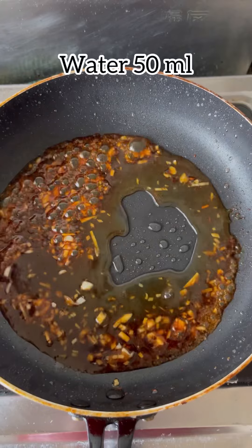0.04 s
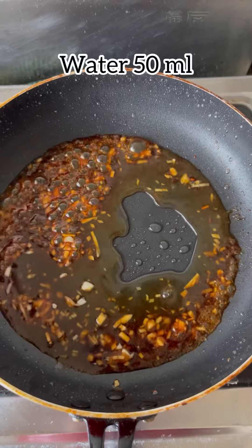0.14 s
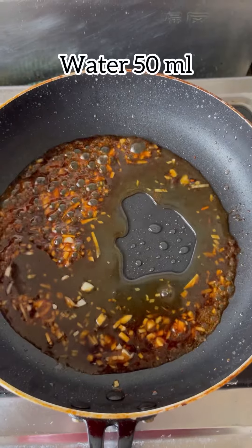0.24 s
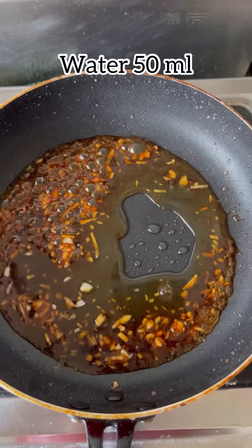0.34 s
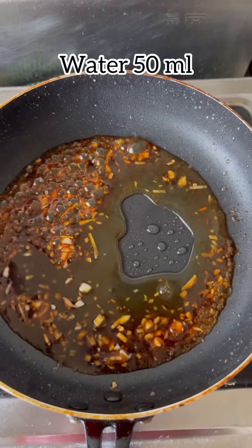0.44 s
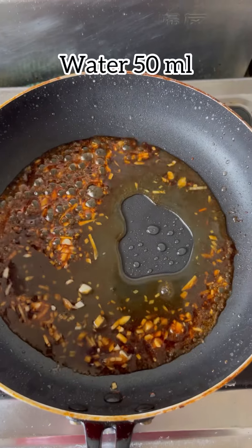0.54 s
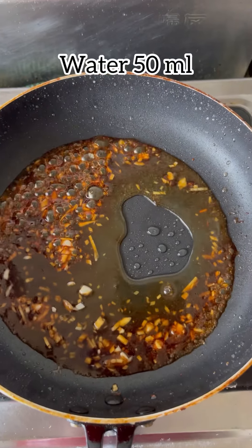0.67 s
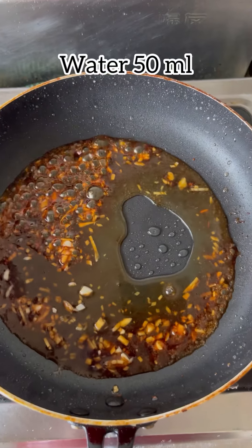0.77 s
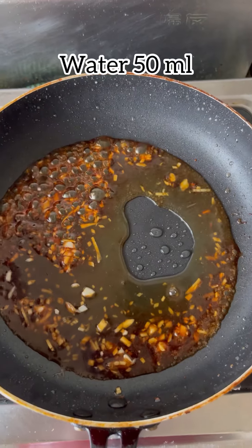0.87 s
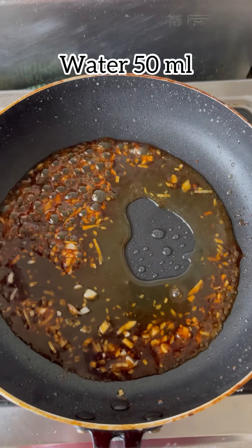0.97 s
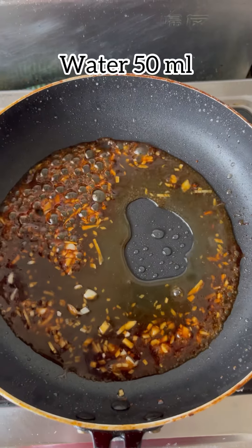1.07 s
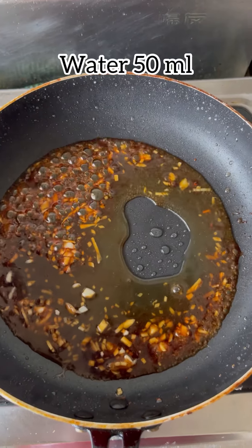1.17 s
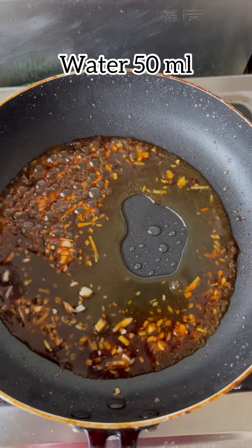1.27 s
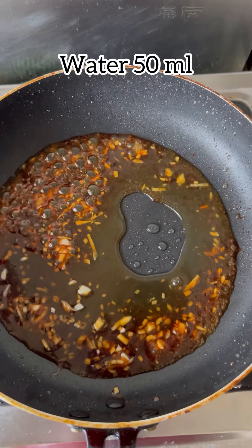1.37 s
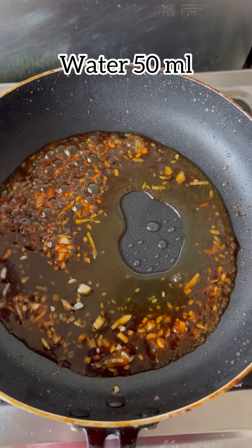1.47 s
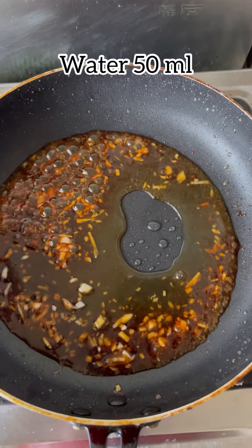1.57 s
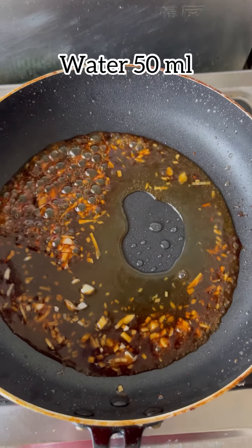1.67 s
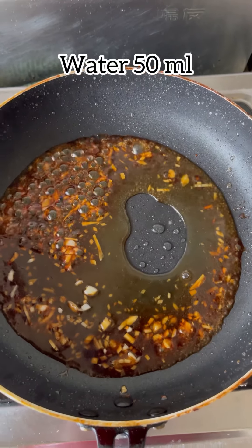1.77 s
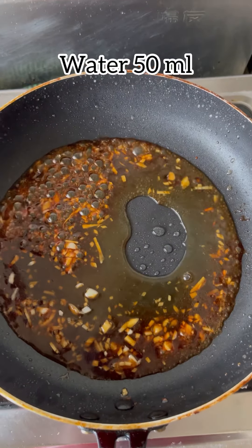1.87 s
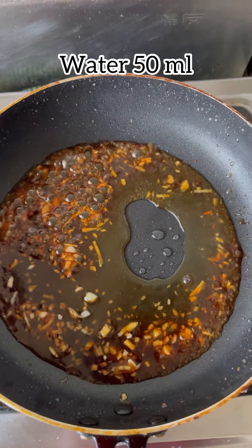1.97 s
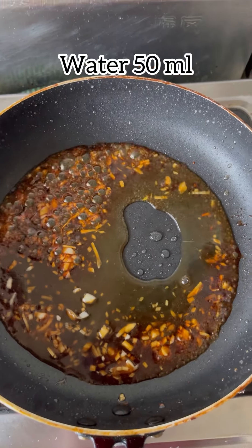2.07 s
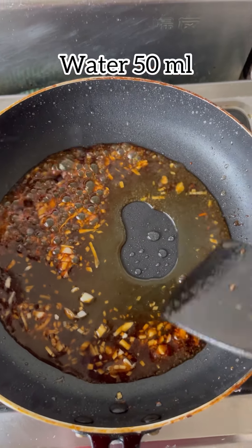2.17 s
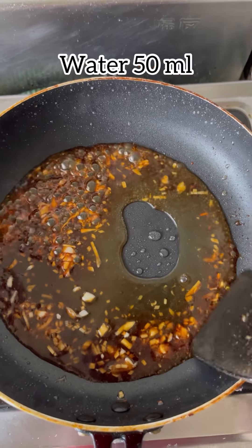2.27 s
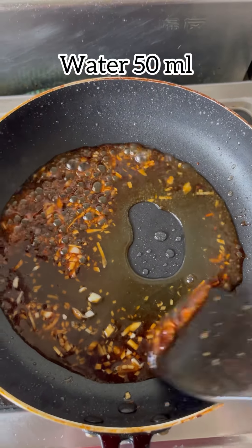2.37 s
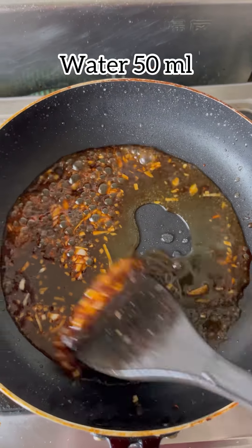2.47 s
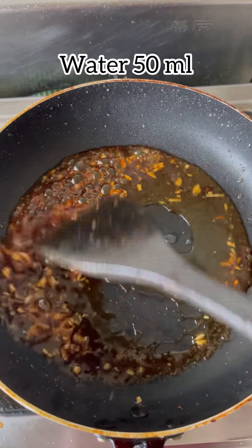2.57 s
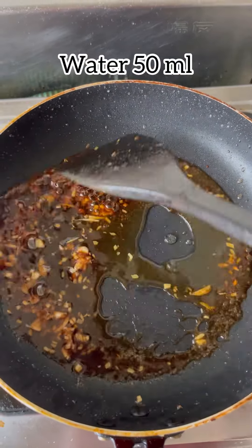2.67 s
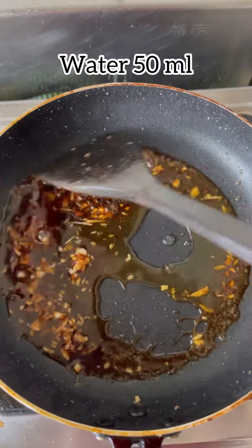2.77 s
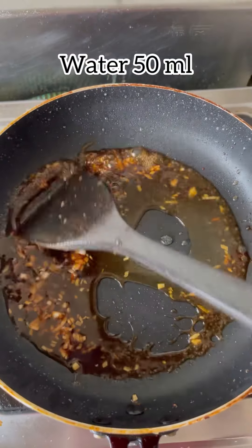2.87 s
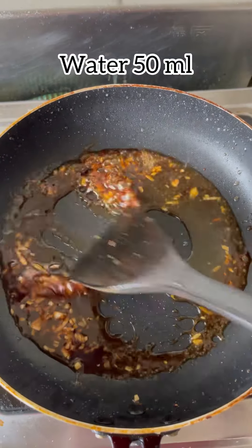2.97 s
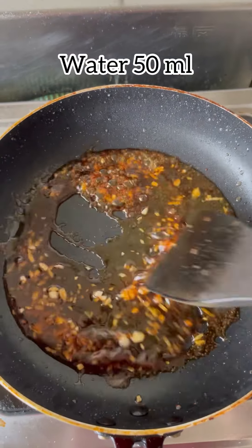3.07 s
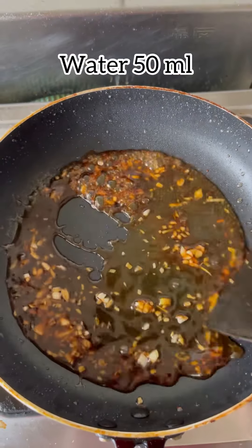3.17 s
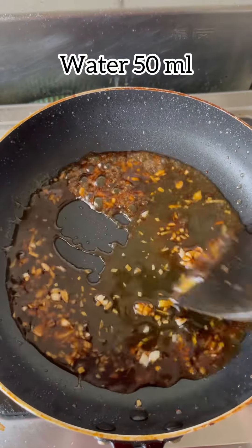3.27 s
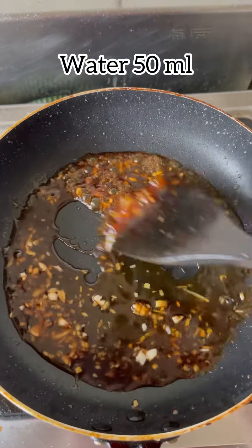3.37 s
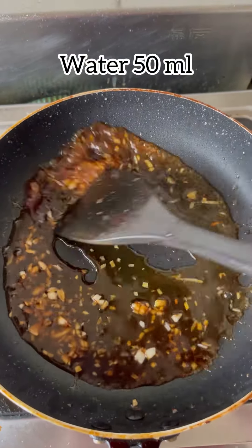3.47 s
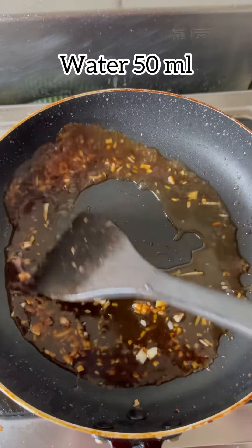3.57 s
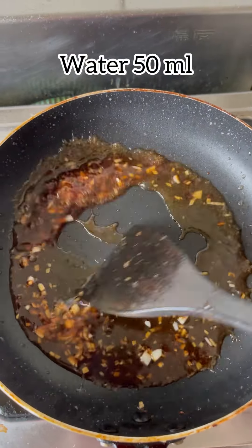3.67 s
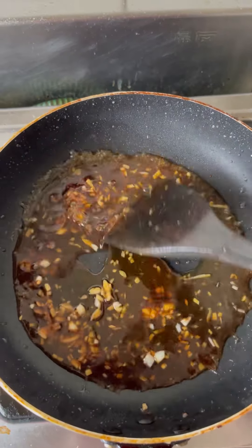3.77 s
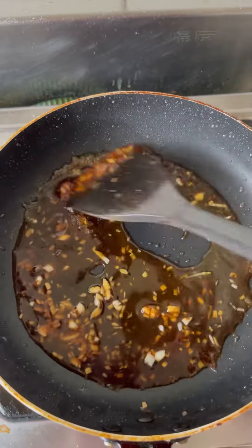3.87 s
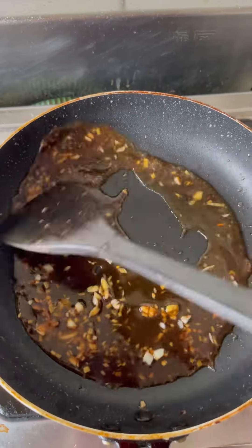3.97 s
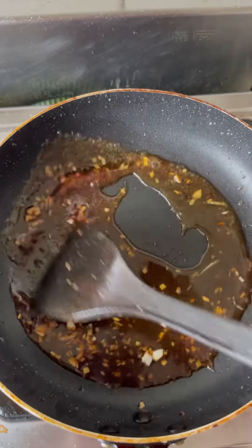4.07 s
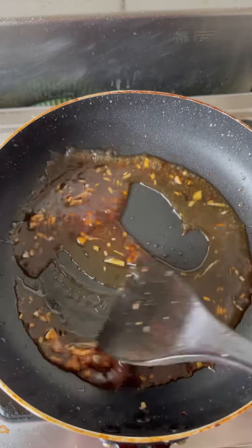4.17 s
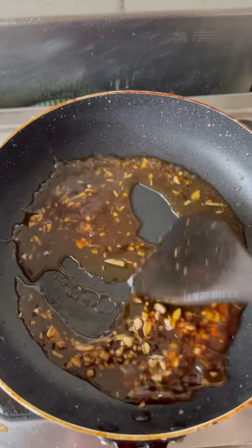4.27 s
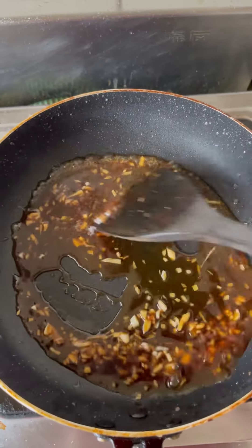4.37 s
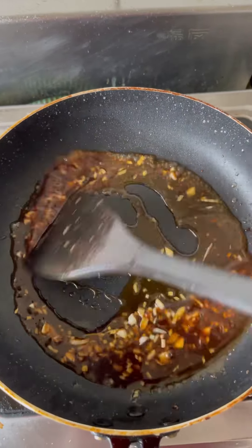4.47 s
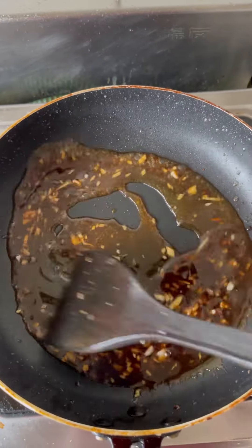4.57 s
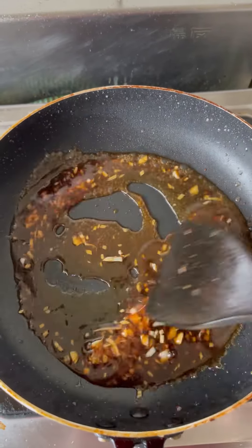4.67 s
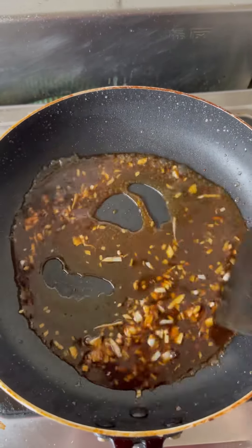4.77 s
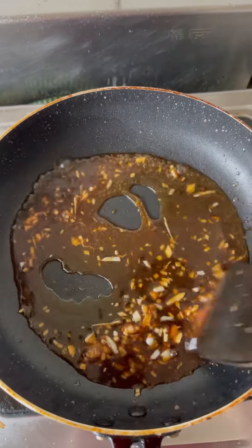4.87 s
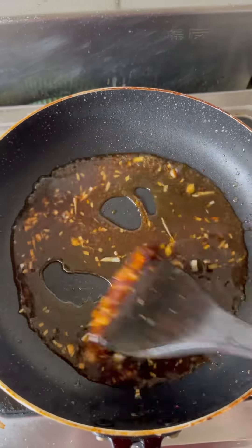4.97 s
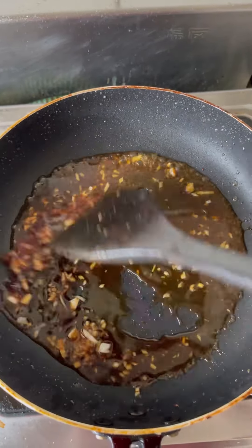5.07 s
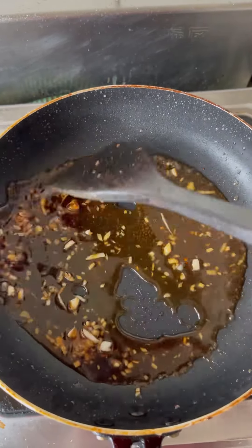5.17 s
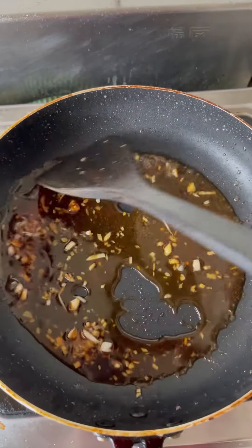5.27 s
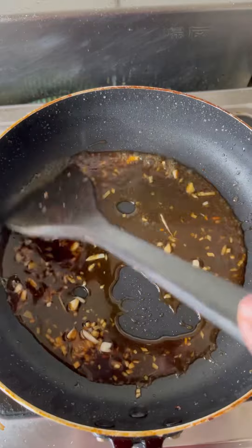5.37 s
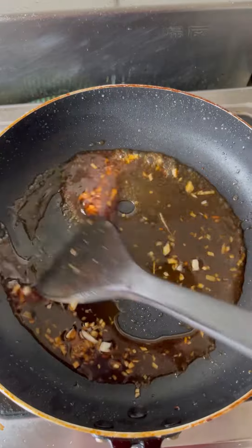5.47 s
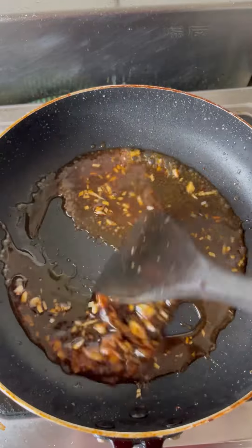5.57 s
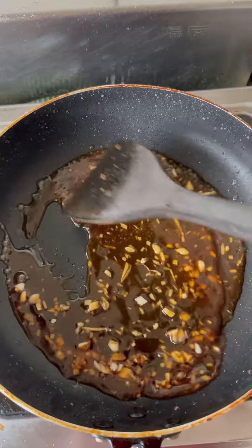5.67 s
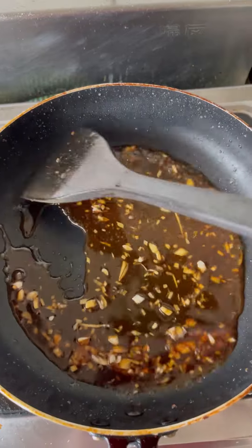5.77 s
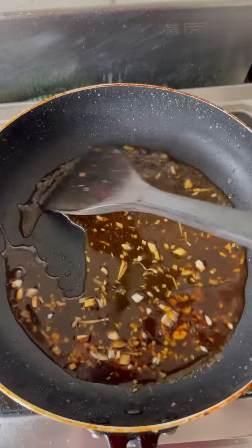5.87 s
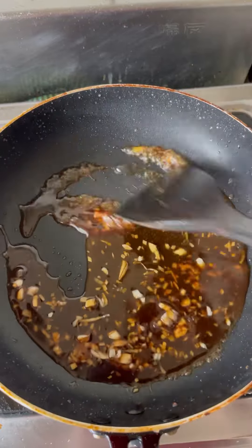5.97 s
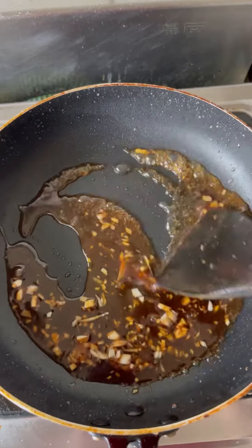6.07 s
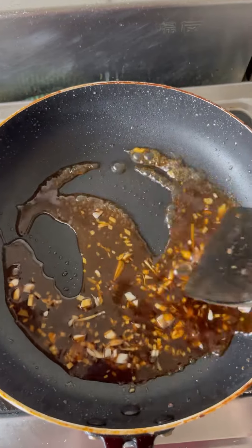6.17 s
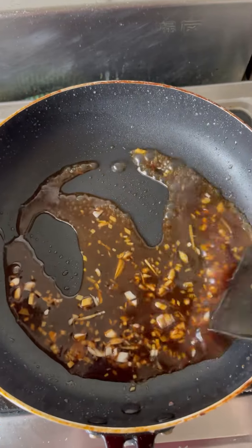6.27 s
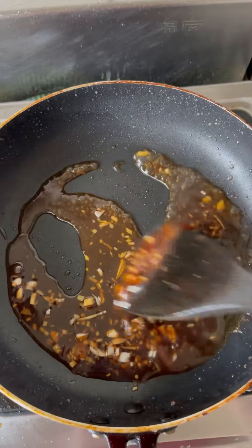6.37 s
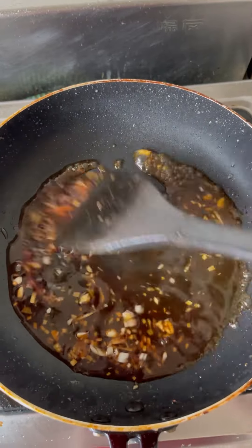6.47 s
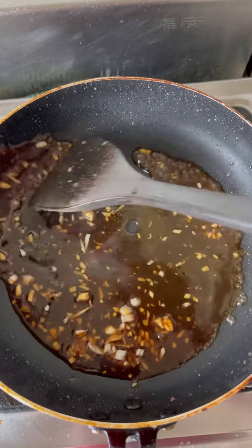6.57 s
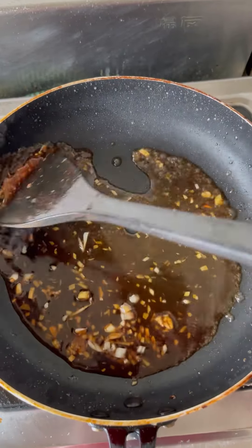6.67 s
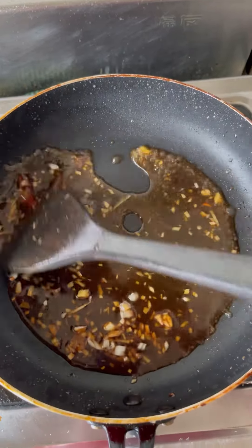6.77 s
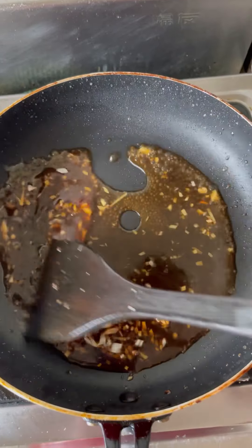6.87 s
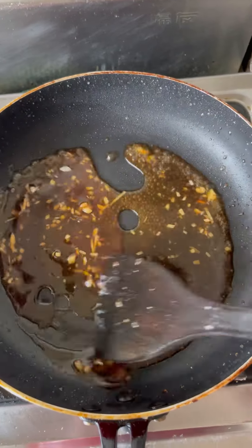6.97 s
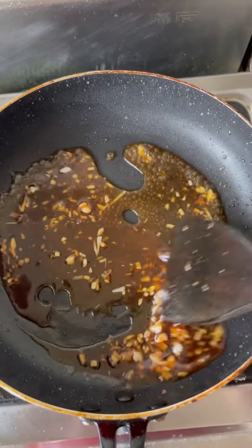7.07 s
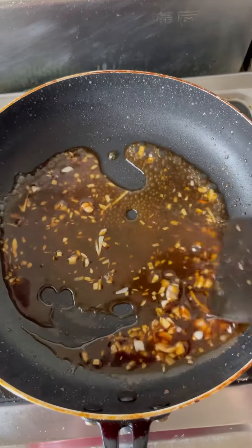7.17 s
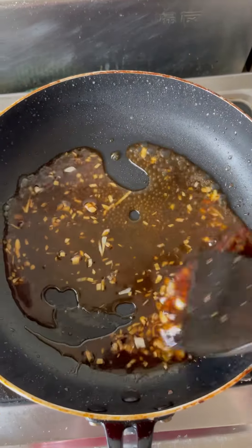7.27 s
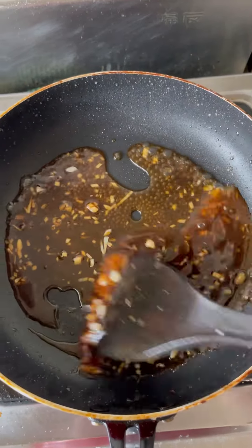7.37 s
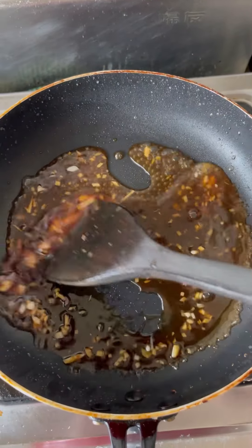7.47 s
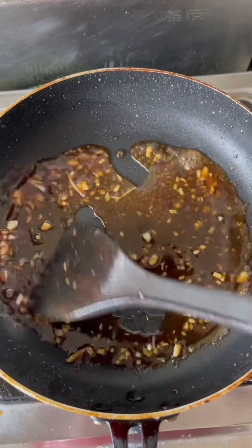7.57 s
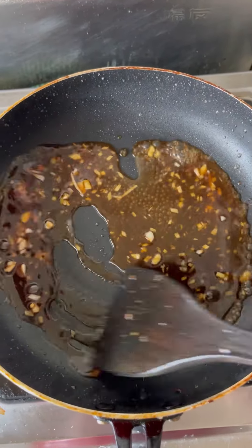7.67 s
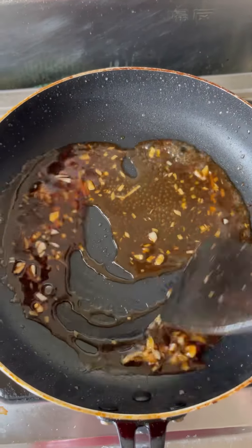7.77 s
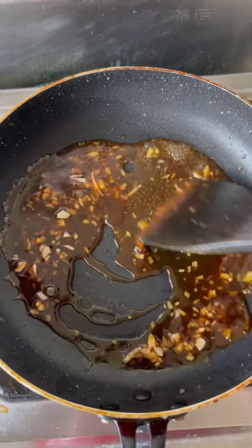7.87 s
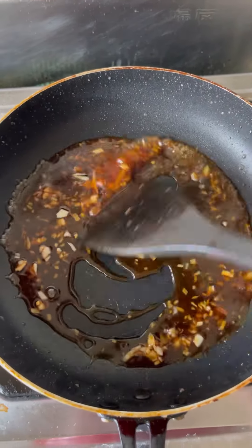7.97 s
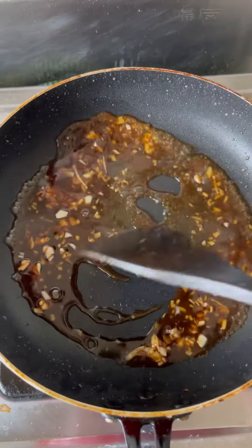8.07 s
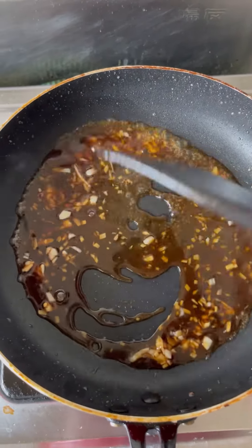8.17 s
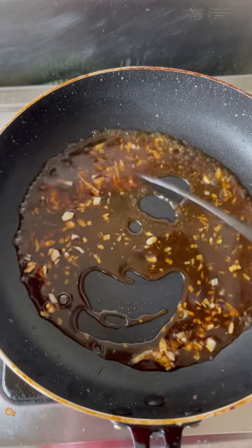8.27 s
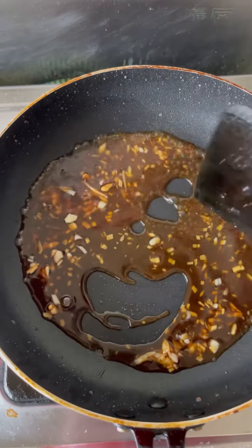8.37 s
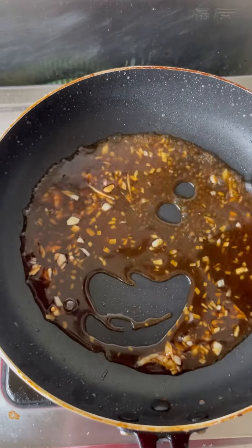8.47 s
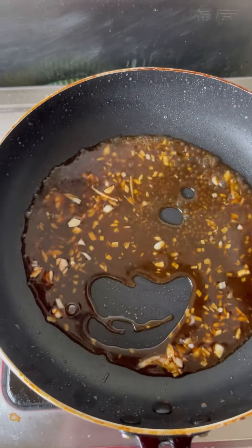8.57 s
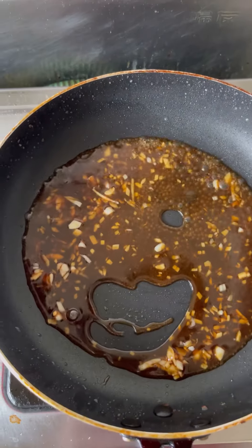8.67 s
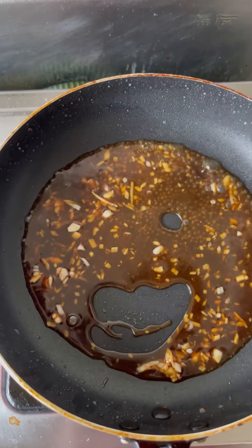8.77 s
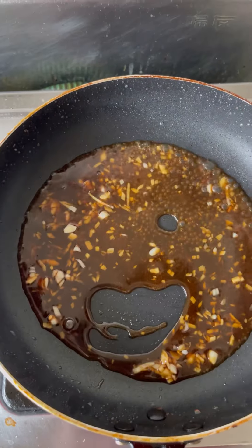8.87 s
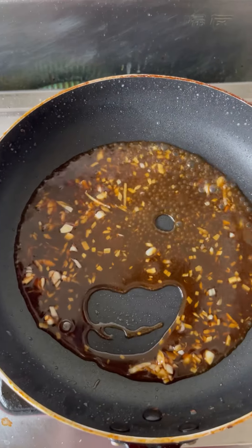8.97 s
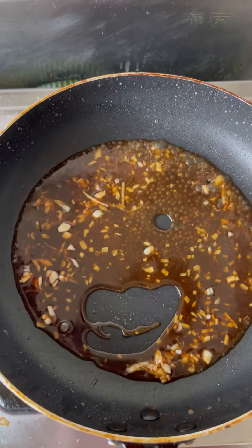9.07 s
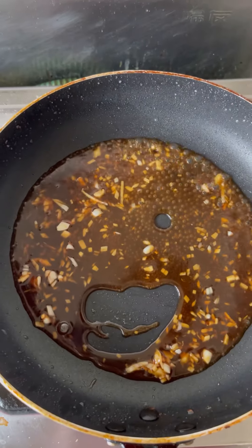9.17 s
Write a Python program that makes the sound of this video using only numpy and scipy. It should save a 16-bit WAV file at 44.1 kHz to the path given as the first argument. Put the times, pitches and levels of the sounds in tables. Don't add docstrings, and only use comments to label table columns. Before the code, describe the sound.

A shallow pan of sauce simmers close to a stereo microphone in a small kitchen. Fine bright sizzle, dense bubbling and frequent sharp spits come first, with a few pan knocks. Then a spatula stirs: clacks, soft scrapes, low thuds of the rocking pan, and hiss that flares with strokes. Spits thin out and the simmer ends quieter. A low extractor hood rumble continues throughout.

```python
import sys
import numpy as np
from scipy import signal
from scipy.fft import rfft, irfft, next_fast_len
from scipy.io import wavfile

SR = 44100
rng = np.random.default_rng(int(sys.argv[2]) if len(sys.argv) > 2 else 0)


def dump_mix(stems):
    frames = np.atleast_2d(stems).T
    limited = np.clip(frames, -1, 1)
    pcm = np.round(limited * 32767).astype(np.int16)
    wavfile.write(sys.argv[1], SR, pcm)


def field_ratio(decibels):
    return 10 ** (np.asarray(decibels, dtype=float) / 20)


N = 407043

# f/Hz, level/dB per Hz
STEAM_SPECTRUM = [(1500, -22), (2500, -10), (3300, -11), (4000, -8), (4600, -7.5), (4920, -15),
                  (5350, -6.5), (6450, -4), (8000, -7), (9400, -4), (10500, -1.5), (11000, -2),
                  (11500, -6.5), (12000, -10), (13000, -16), (14000, -14), (16000, -6)]
STEAM_LAG = 7.3


def rms_one(x):
    return x / np.sqrt(np.mean(x ** 2) + 1e-20)


def drift(rate):
    step = 40
    r = np.exp(-2 * step * np.pi * rate / SR)
    slow = signal.lfilter([1], [1, -2 * r, r * r], rng.standard_normal(N // step + 2002))[2000:]
    return np.interp(np.arange(N) / step, np.arange(len(slow)), rms_one(slow))


def colour(x, points, size=8192):
    hz, level_db = np.transpose(points)
    grid = np.maximum(np.fft.rfftfreq(size, 1 / SR), 1)
    log_gain = np.log(field_ratio(np.interp(np.log(grid), np.log(hz), level_db)))
    cepstrum = irfft(log_gain)
    cepstrum[1:size // 2] *= 2
    cepstrum[size // 2 + 1:] = 0
    response = irfft(np.exp(rfft(cepstrum)))
    return signal.oaconvolve(np.atleast_2d(x), response[None], axes=1)[:, :N]


def ports(x, lag):
    size = next_fast_len(N + 64)
    delay = np.exp(-2j * np.pi * np.fft.rfftfreq(size) * lag)
    late = irfft(rfft(x, size) * delay, size)[:N]
    return np.array([x, late])


def ring(clicks, hz, t60):
    r = field_ratio(-60 / (max(t60, .0005) * SR))
    w = 2 * np.pi * hz / SR
    return signal.lfilter([0, np.sin(w)], [1, -2 * r * np.cos(w), r * r], clicks + 1e-18)


def grains(per_s, spread_db):
    sizes = field_ratio(spread_db * np.minimum(rng.exponential(1, N), 6))
    signs = rng.choice([-1, 1], N)
    return sizes * signs * (rng.random(N) < per_s / SR)


def add(out, x, s):
    at = round(s * SR)
    out[..., at:at + x.shape[-1]] += x[..., :N - at]


def hood():
    # f/Hz, level/dB per Hz
    duct_spectrum = [(15, -43), (25, -37), (36, -37), (48, -6), (64, -8), (75, -10.5), (113, -1),
                     (188, -5.5), (217, -1), (249, -3.5), (321, -5), (409, -12.5), (435, -13), (470, -19),
                     (520, -32), (680, -61), (1140, -120)]
    # f/Hz, level/dB per Hz
    common_spectrum = [(260, -15), (450, -13), (567, -6), (618, -3.5), (708, -4), (802, -7.5), (1040, -4.5),
                       (1230, -9.5), (1780, -17.5), (2100, -12.5), (3310, -14.5), (3970, -14.5),
                       (4500, -17.5), (5850, -24.5), (9900, -120)]
    # f/Hz, level/dB per Hz
    opposed_spectrum = [(35, -53), (60, -24), (140, -21), (241, -1), (322, -9.5), (379, 4.5), (534, -13),
                        (606, 4.5), (726, -9), (1180, -7), (1550, -47), (2110, -65), (2520, -48.5),
                        (2970, -12.5), (4500, -10), (5850, -16.5), (9900, -120)]
    duct, mid, side = rng.standard_normal((3, N))
    rumble_db = -24 + .7 * drift(0.48)
    rumble = field_ratio(rumble_db) * rms_one(colour(duct, duct_spectrum))
    common = field_ratio(-36) * rms_one(colour(mid, common_spectrum))
    opposed = field_ratio(-36) * rms_one(colour(side, opposed_spectrum))
    return rumble + (common + opposed * [[1], [-1]]) * field_ratio([[-.5], [.5]])


def vigour(t):
    # t/s, level/dB
    simmer = [(0, -38.5), (.64, -37), (1.03, -40.5), (1.75, -38), (3.2, -36.5), (4.3, -39.5), (4.8, -41.5),
              (5.75, -43), (6.2, -37), (7.25, -42.5), (9.23, -42)]
    # t/s, rise/dB, hold/s
    flares = [
        (2.863, 1.5, 0.13),
        (3.352, 5.5, 0.4),
        (3.82, 4, 0.3),
        (5.226, 3.5, 0.21),
        (5.886, 6.5, 0.17),
        (5.942, 0.5, 0.076),
        (6.216, 3, 0.13),
        (7.414, 3.5, 0.29),
        (7.804, 3, 0.46),
        (8.7, 1.5, 0.35),
    ]
    rise_s, fall_s = 0.051, 0.2
    level_db = np.interp(t, *np.transpose(simmer))
    for s, rise_db, hold_s in flares:
        rise = (t - s) / rise_s
        fall = 1 - (t - s - hold_s) / fall_s
        level_db = level_db + rise_db * np.clip(np.minimum(rise, fall), 0, 1)
    return level_db


def sizzle(level_db):
    dulling_db_per_s = -0.13
    out, together = 0, drift(14)
    for low_hz, high_hz, shift in [(1200, 5600, .4), (5600, 8200, -.25), (8200, 19000, .2), (5600, 19000, -.1)]:
        flicker_db = .8 * together + 1.3 * drift(20) + 2.2 * drift(60)
        bursts = rms_one(grains(6000, spread_db=4.0)) * field_ratio(flicker_db)
        if low_hz > 8000:
            bursts = bursts * field_ratio(dulling_db_per_s * np.arange(N) / SR)
        band = signal.butter(2, [low_hz, high_hz], "band", fs=SR, output="sos")
        out = out + ports(signal.sosfilt(band, bursts), STEAM_LAG + shift)
    out = rms_one(out) + field_ratio(-15) * rng.standard_normal((2, N))
    return field_ratio(level_db + 4.0) * rms_one(colour(out, STEAM_SPECTRUM))


def bubbles(level_db, pitch_hz):
    # f/Hz, level/dB
    hollow = [(1100, 2), (1380, 4.5), (1750, 0), (1920, 1), (2060, -2), (2300, 2), (2550, 3.5), (2800, 6.5),
              (3300, -6), (4000, 4)]
    sauce_lag = 23
    clicks = grains(5000 * field_ratio(2.7 * drift(7.2)), spread_db=3.0)
    pitches = np.geomspace(1100, 3600, 16)
    dealt = rng.integers(0, 16, N)
    spots = rng.normal(0, 1, 16)
    out = np.zeros((2, N))
    for k, hz in enumerate(pitches):
        swell = ring(clicks * (dealt == k), hz, 16.0 / hz)
        pop = rms_one(ring(swell, hz, 9.0 / hz))
        pop = pop * field_ratio(-7.5 * abs(np.log2(hz / pitch_hz)))
        out += [pop, np.roll(pop, round(sauce_lag + 2.8 * spots[k]))]
    return field_ratio(level_db + 4.0) * rms_one(colour(out, hollow))


def spits():
    # t/s, peak level/dB, left over right/dB
    loud_drops = [(0.0648, -21, -0.5), (0.1281, -16, 0.0), (0.149, -13.5, -0.5), (0.3986, -16, -4),
                  (0.5197, -20, -0.5), (0.578, -22, 0.0), (0.6484, -18, -0.5), (0.6982, -14.5, 2.5),
                  (0.763, -15, 3), (0.783, -16, -6), (0.903, -15, -2), (0.992, -10, 1), (1.114, -15.5, 0),
                  (1.288, -15, -0.5), (1.3448, -6, 1), (1.432, -14, -0.5), (1.558, -15.5, 0.5),
                  (1.6591, -7.5, 0.5), (1.716, -10.5, 0.0), (1.822, -15, -4), (1.9591, -13, 2),
                  (2.009, -15, -0.5), (2.2005, -15, 4), (2.219, -15.5, -9), (2.2942, -10.5, -2),
                  (2.581, -14, -6), (2.68, -14, -0.5), (2.7278, -24, -3), (2.861, -24, 3.0), (2.877, -6, 3),
                  (3.1458, -13, 0), (3.1886, -15, 12), (3.2271, -8, 1), (3.268, -5, -1), (3.292, -14.5, 0),
                  (3.475, -11.5, -7), (3.9743, -11, 0.0), (4.564, -13.5, 0.0), (4.716, -14, 1),
                  (4.7363, -13, 0.5), (4.8443, -14, -0.5), (5.1795, -14.5, -0.5), (5.5212, -12, -10),
                  (5.5504, -18, 2), (5.7004, -21, 0.5), (5.709, -14.5, -3), (5.745, -14, -1),
                  (5.861, -12, 3), (5.916, -12, -3), (6.7072, -11, 0.0), (6.8907, -17, -0.5),
                  (7.1693, -17, -0.5), (7.2794, -19, -12), (7.4699, -18, 0.0), (7.486, -15, 6),
                  (8.1607, -15, -2), (8.6034, -15.5, -2), (8.7226, -18, 3), (8.9332, -15, 0.0),
                  (9.0678, -14, 0.0)]
    most = 150
    when, chance = rng.random((2, most)) * [[N / SR], [most * SR / N]]
    stirred = (when > 3.3) & (when < 8.4)
    rate = 15 * np.where(stirred, .22, 1)
    small_db = -23.5 + rng.standard_normal(most) - 99 * (chance > rate)
    small_pan_db = -6.5 + 6.5 * rng.standard_normal(most)
    drops = list(zip(when, small_db, small_pan_db)) + list(loud_drops)
    bright, body, t = np.zeros((2, N)), np.zeros((2, N)), np.arange(400) / SR
    for (s, peak_db, pan_db), draw in zip(drops, rng.standard_normal((len(drops), 403))):
        decay_s = 0.0019 * field_ratio(draw[0])
        puff = draw[3:] * np.exp(-t / decay_s)
        puff = np.outer(field_ratio([pan_db / 2, -pan_db / 2]), puff / np.abs(puff).max())
        add(bright, puff * field_ratio(peak_db + 9.5), s)
        add(body, puff * field_ratio(peak_db - 17 + 3 * draw[2]), s)
    dull = signal.butter(2, [2600, 5200], "band", fs=SR, output="sos")
    both = colour(bright, STEAM_SPECTRUM) + signal.sosfilt(dull, body)
    return np.array([both[0], ports(both[1], STEAM_LAG)[1]])


def knocks():
    # t/s, peak level/dB, ring f/Hz, 3-8 kHz crack relative level/dB
    blows = [(0.205, -15, 1940, -29), (0.272, -24, 1380, -21), (0.98, -14, 2300, -26),
             (1.163, -25.5, 1690, -22), (1.346, -29, 1420, 1), (1.663, -12.5, 2140, -12),
             (2.102, -26, 2410, -24), (2.295, -10, 2130, -21), (2.458, -16.5, 2470, -23),
             (2.877, -18, 2850, -6), (3.089, -19.5, 3080, -20), (3.231, -9, 2060, -14),
             (3.709, -25, 1370, -14), (3.973, -19, 2780, -16), (4.071, -19, 1330, -12),
             (4.843, -10, 2070, -12), (5.265, -23, 1040, -16), (5.363, -11.5, 910, -34.5),
             (5.366, -24, 740, -25), (5.818, -22.5, 1020, -15), (5.896, -16.5, 1500, -23),
             (5.93, -20, 1530, -11), (6.14, -16, 1380, -19), (6.2937, -10, 2015, -21),
             (6.643, -25, 1510, -9), (6.651, -12, 1510, -15), (7.2024, -13, 1950, -28),
             (7.777, -24, 3940, -15), (8.623, -19, 3950, -25), (8.378, -27, 1020, -15),
             (8.69, -30, 1080, -4), (1.665, -21, 3370, -7), (1.673, -30, 2920, 5), (1.681, -27, 2680, -3),
             (2.299, -20, 950, -22), (2.296, -17, 3140, -15), (2.302, -22, 2900, -9),
             (2.303, -14, 2130, -20), (2.31, -26, 2980, -6), (3.2303, -9, 1540, -20),
             (3.233, -20, 950, -25), (3.242, -17, 1540, -20), (3.974, -15, 1930, -21),
             (5.363, -24, 2140, -25), (6.295, -28, 1500, -25), (6.296, -25, 990, -25),
             (7.2029, -20, 1504, -28), (7.213, -31, 1570, -25), (7.556, -34, 2640, -4),
             (2.918, -21, 4300, -12), (2.528, -20, 2450, -20), (5.344, -30, 4000, -25),
             (5.483, -24, 3970, -25), (5.637, -24, 4030, -25)]
    # t/s, peak level/dB, ring f/Hz, crack relative level/dB
    bursts = [(0.2, -24, 1500, -25), (0.37, -23, 1410, -10), (0.562, -25, 1150, -28),
              (0.599, -27, 1870, -22), (1.049, -22, 2350, -25), (1.118, -27, 2340, -20),
              (1.3014, -28, 4100, -15), (1.4255, -23, 2300, -15), (1.5054, -24, 2590, -22),
              (1.8823, -21, 2450, -18), (2.0722, -25, 2400, -20), (2.104, -25, 1470, -25),
              (2.3436, -24, 1450, -23), (2.347, -36, 2330, -20), (2.36, -31, 1500, -20),
              (2.419, -21.5, 1730, -24), (2.553, -28, 2500, -20), (2.6324, -30, 2280, -20),
              (2.678, -25, 2400, -20), (2.7472, -26, 2350, -22), (2.7696, -25, 2410, -22),
              (2.815, -30, 1540, -20), (4.199, -26, 4050, -20), (4.227, -26, 1400, -20),
              (4.43, -28, 4200, -13), (4.454, -31, 2470, -20), (4.612, -29, 3850, -20),
              (4.718, -36, 3700, -15), (4.869, -23.5, 4000, -10), (4.948, -29, 3880, -20),
              (5.096, -24.5, 4140, -15), (5.149, -28, 2820, -22), (6.1804, -27, 2130, -20),
              (6.643, -20, 2840, -15), (6.652, -31, 2900, -13), (6.765, -27, 2330, -20),
              (7.4853, -29, 3900, -10), (7.556, -27, 3900, -20), (7.9264, -26, 2490, -20),
              (7.94, -31, 1700, -20), (8.41, -31, 1800, -22), (8.439, -31, 3970, -20),
              (8.485, -28, 4500, -20), (8.69, -25, 4080, -18), (8.8807, -26.5, 3000, -8),
              (9.165, -25, 2720, -20)]
    # f/Hz, level/dB, t60/s
    pan_modes = [(1034, -13, 0.068), (1552, -8.5, 0.026), (2190, -6.5, 0.012), (2470, -12.5, 0.05),
                 (2820, -11, 0.018)]
    chatter_s, slap_s = .0014, 0.011
    out, t = np.zeros(N), np.arange(4000) / SR
    crack = signal.butter(2, [3300, 8000], "band", fs=SR, output="sos")
    hits = blows + bursts
    noise = rng.standard_normal((len(hits), len(t) + len(pan_modes)))
    for (s, peak_db, hz, crack_db), draw in zip(hits, noise):
        contact = draw[:len(t)] * np.exp(-t / chatter_s)
        bright = signal.sosfilt(crack, contact)
        contact = contact + 7.2 * (t == 0)
        t60 = .013 * (hz / 1500) ** .15
        blow = ring(ring(contact, hz, t60), hz, 0.0059)
        blow = 2.5 * blow / np.abs(blow).max()
        for (mode_hz, mode_db, mode_t60), chance in zip(pan_modes, draw[len(t):]):
            blow = blow + field_ratio(-12 + mode_db + 1.4 * chance) * ring(contact, mode_hz, mode_t60)
        wet = signal.butter(2, [.7 * hz, 1.4 * hz], "band", fs=SR, output="sos")
        slap = signal.sosfilt(wet, draw[len(t) - 1::-1] * np.exp(-t / slap_s))
        add(out, field_ratio(peak_db + 1.5) * blow / np.abs(blow).max(), s)
        add(out, field_ratio(peak_db - 11) * slap / np.abs(slap).max(), s)
        add(out, field_ratio(peak_db + crack_db + 16.5) * bright / np.abs(bright).max(), s)
    return ports(out, 2.13) * field_ratio([[-.5], [.5]])


def thuds():
    # t/s, peak level/dB, f/Hz, upper body relative level/dB
    rocks = [(0.359, -14, 247, 0.5), (1.258, -13.5, 221, -26), (1.659, -14.5, 160, -2),
             (2.304, -7.5, 236, -6.5), (2.879, -16.5, 318, -3), (3.246, -16.5, 229.7, -9),
             (5.374, -10.5, 223.4, -9.5), (5.823, -8.5, 222, -10), (6.289, -19, 150, -14),
             (7.201, -18, 160, -13), (8.872, -12, 212.5, -21), (2.345, -13, 252, -15), (5.2, -22, 279, -16),
             (6.149, -19, 200, -15), (8.35, -22, 280, -15)]
    # f/Hz, level/dB, t60/s
    body_modes = [(350.4, 1.5, 0.17), (476, -4, 0.2), (535, 2.5, 0.077), (644, 13, 0.025),
                  (835, -9.5, 0.19), (1020, -0.5, 0.04)]
    out, t = np.zeros(N), np.arange(9000) / SR
    push = 1 - np.exp(-t / 0.0072)
    chances = rng.standard_normal((len(rocks), len(body_modes)))
    for (s, peak_db, low_hz, upper_db), chance in zip(rocks, chances):
        body = field_ratio(1.5 - 60 * t / .16) * np.sin(2 * np.pi * low_hz * t)
        for (hz, mode_db, t60), c in zip(body_modes, chance):
            level_db = upper_db + mode_db - 6.0 + 0.21 * c
            body = body + field_ratio(level_db - 60 * t / t60) * np.sin(2 * np.pi * hz * t)
        add(out, field_ratio(peak_db) * push * body, s)
    return out


def scrapes():
    # start t/s, end t/s, rms
    # level/dB, centre f/Hz
    slides = [(1.625, 1.718, -30.5, 2230), (2.264, 2.458, -39.5, 1970), (3.237, 3.61, -38, 2070),
              (3.774, 3.972, -41, 1510), (4.18, 4.446, -42, 1260), (4.853, 5.006, -54, 1600),
              (5.27, 5.35, -47, 2500), (5.91, 6.193, -39, 3470), (6.29, 6.36, -39, 1600),
              (7.28, 7.39, -39, 1440), (7.28, 7.31, -41, 3600), (6.0, 6.25, -49, 3000),
              (7.886, 7.997, -38.5, 2210), (8.494, 8.91, -48, 3920)]
    # start t/s, end t/s, rms level/dB, f/Hz
    squeaks = [(2.297, 2.37, -42, 2080), (2.3, 2.345, -33.5, 913), (2.313, 2.36, -37.5, 507),
               (2.8, 3.4, -47, 760), (3.9, 4.21, -46, 800), (2.3, 2.74, -51, 2600),
               (3.5, 3.72, -43.5, 3200), (3.84, 3.9, -38, 1580), (4.32, 4.4, -41, 1200),
               (3.85, 4.15, -46, 3000), (4.46, 4, -52, 2200), (4.88, 4.94, -37, 1500),
               (4.95, 5.0, -39, 1500), (4.08, 4.25, -44, 560), (4.1, 3.84, -45, 2900),
               (4.0, 4.15, -46, 2400), (5.83, 5.87, -40, 4000), (4.7, 6.12, -51, 3100),
               (7.545, 7.62, -42, 2660), (7.24, 7.3, -47, 1900), (6.3, 6.325, -37, 1570),
               (6.61, 6.64, -37, 6000), (7.3, 7.38, -45, 1400)]
    ticks, out = grains(4000, spread_db=4.5), np.zeros(N)
    for strokes, width in [(slides, 0.91), (squeaks, .1)]:
        for start, end, level_db, hz in strokes:
            stroke = ticks[round(start * SR):round(end * SR)]
            t60 = np.log(1000) / (np.pi * width * hz)
            tone = rms_one(ring(ring(stroke, hz, t60), hz, t60))
            add(out, field_ratio(level_db + 6.5) * tone * np.hanning(len(stroke)), start)
    return ports(out, 1.2)


def kitchen(x):
    t = np.arange(round(.2 * SR)) / SR
    tail = rng.standard_normal((2, len(t))) * field_ratio(-60 * t / .16) * (t > .003)
    tail = rms_one(signal.lfilter([.4], [1, -.6], tail)) / np.sqrt(len(t))
    return signal.oaconvolve(x, tail, axes=1)[:, :N]


def scene():
    # t/s, f/Hz
    bubble_pitch = [(0, 2250), (1, 2180), (2.2, 2280), (2.5, 2430), (3.0, 2380), (3.3, 2090), (3.6, 3000),
                    (3.8, 2680), (4.25, 1600), (4.55, 2520), (5.0, 2080), (5.8, 2060), (6.08, 2780),
                    (6.5, 2070), (7.5, 2300), (8.0, 2360), (9.23, 2230)]
    t = np.arange(N) / SR
    coming_db = vigour(t + 0.1) + 36
    bubbling_db = -35.5 + 0.67 * coming_db - .5 * t
    pitch_hz = np.interp(t, *np.transpose(bubble_pitch))
    hits = knocks() + spits()
    pan = sizzle(vigour(t) + 2) + bubbles(bubbling_db, pitch_hz) + scrapes() + thuds()
    return pan + hits + field_ratio(-14) * kitchen(hits) + hood()


def band_limit(x):
    return signal.sosfilt(signal.butter(12, 15780, fs=SR, output="sos"), x)


def record(dry):
    return band_limit(dry)


dry = scene()
out = record(dry)
dump_mix(out)
```